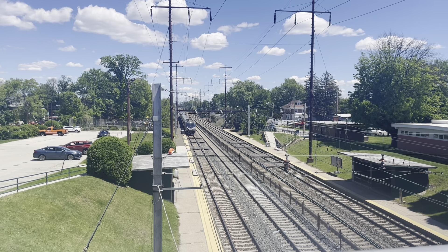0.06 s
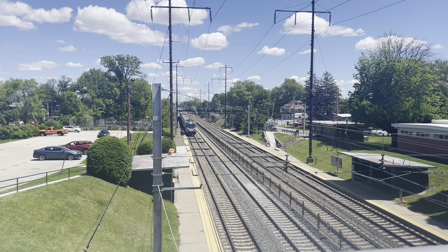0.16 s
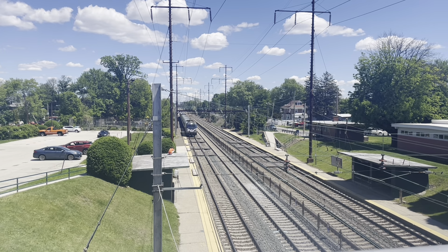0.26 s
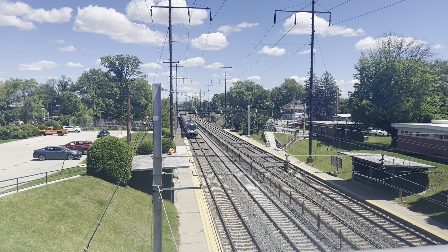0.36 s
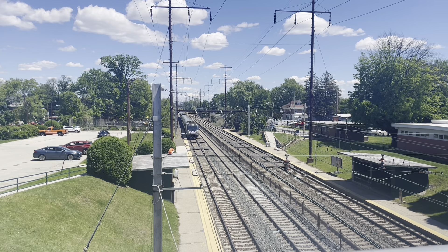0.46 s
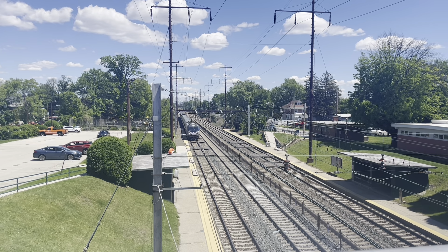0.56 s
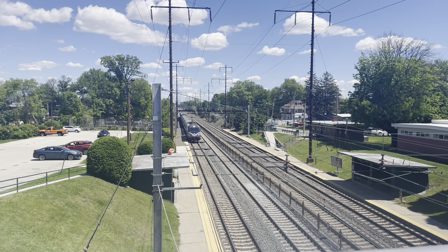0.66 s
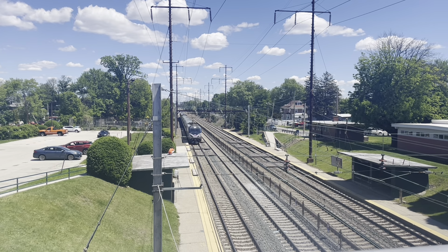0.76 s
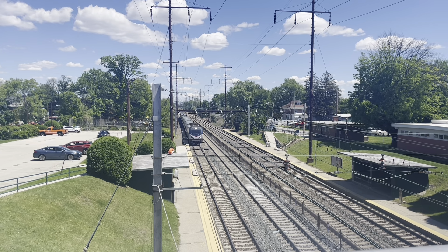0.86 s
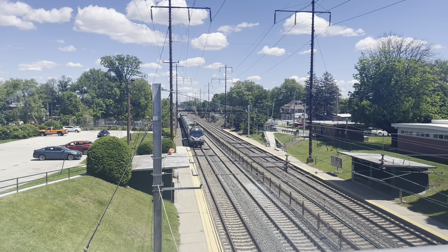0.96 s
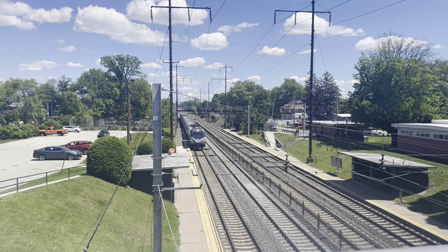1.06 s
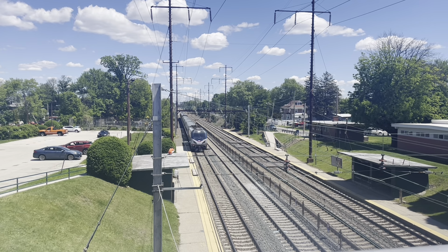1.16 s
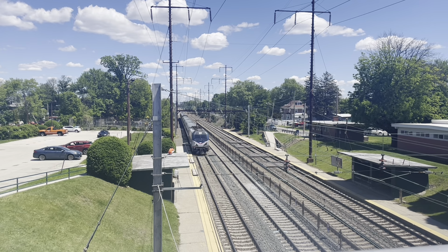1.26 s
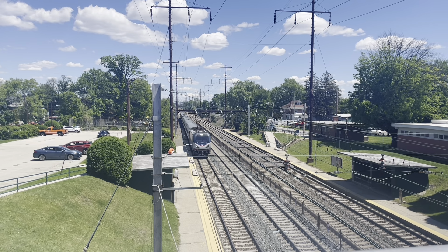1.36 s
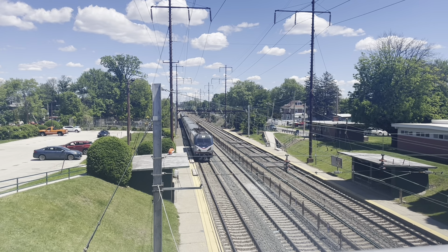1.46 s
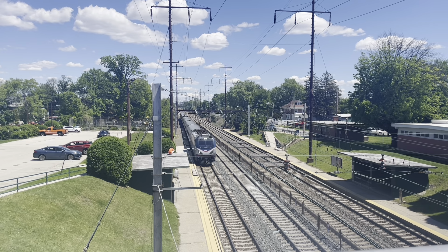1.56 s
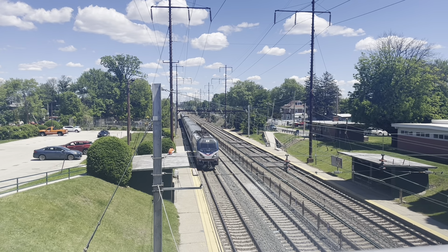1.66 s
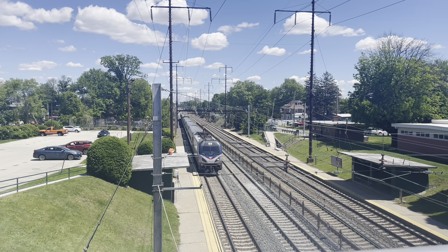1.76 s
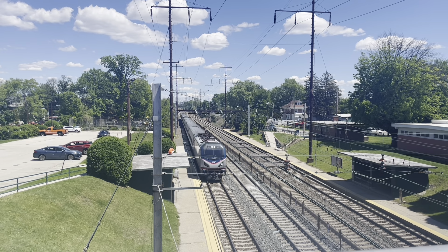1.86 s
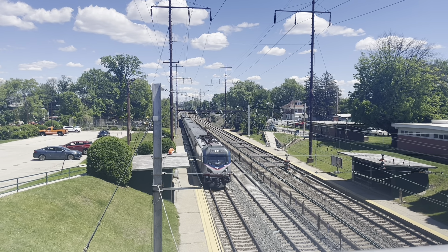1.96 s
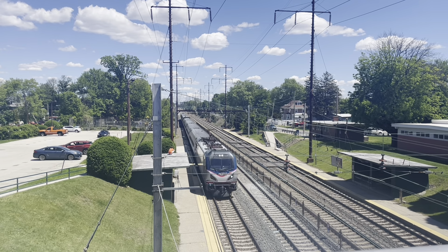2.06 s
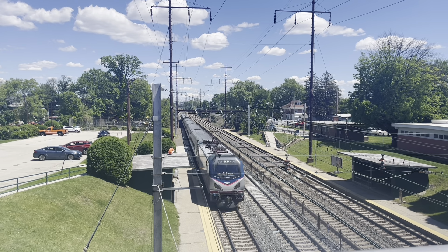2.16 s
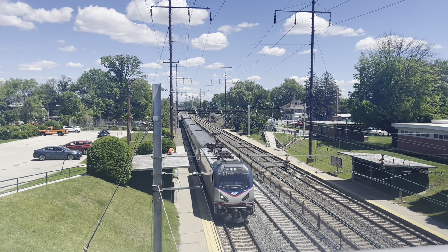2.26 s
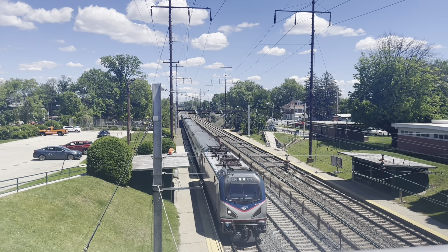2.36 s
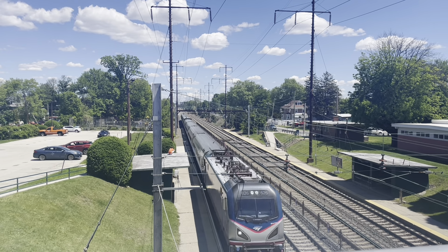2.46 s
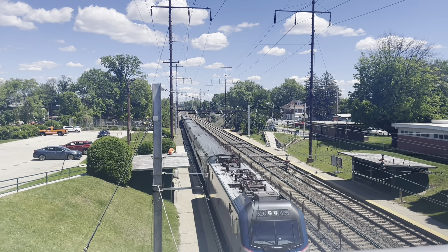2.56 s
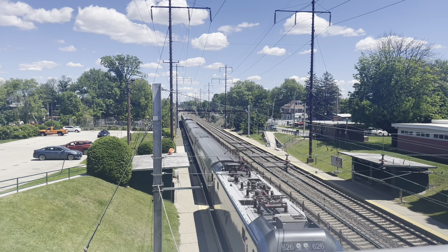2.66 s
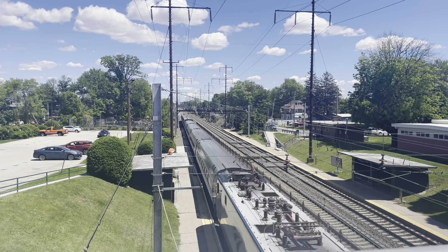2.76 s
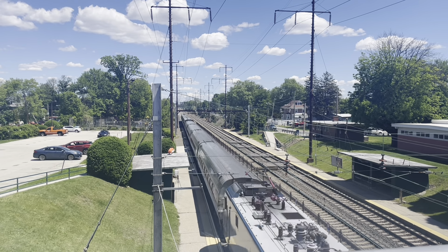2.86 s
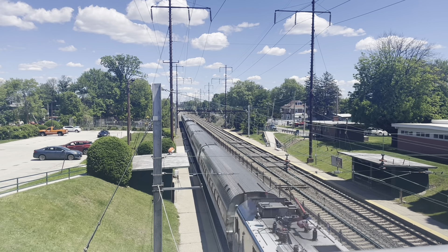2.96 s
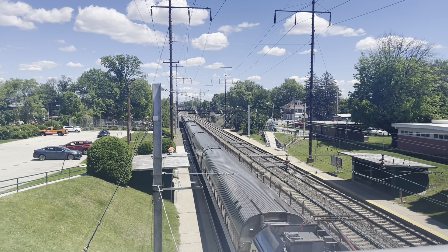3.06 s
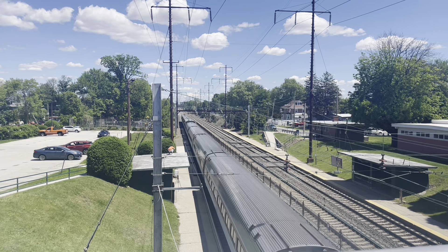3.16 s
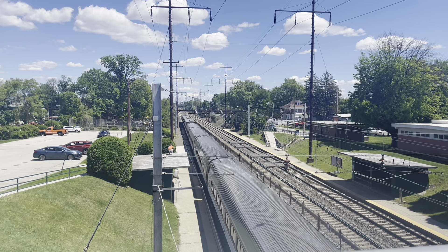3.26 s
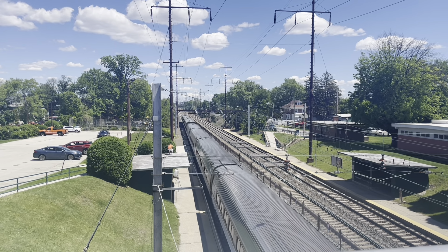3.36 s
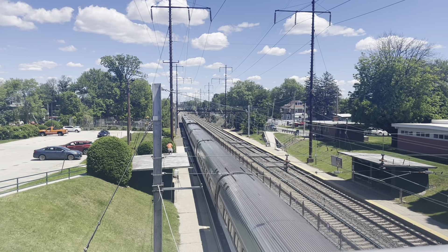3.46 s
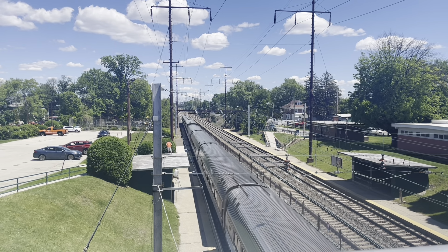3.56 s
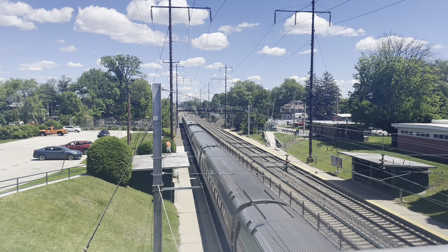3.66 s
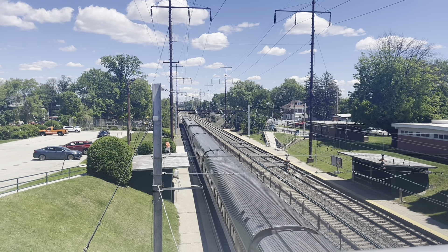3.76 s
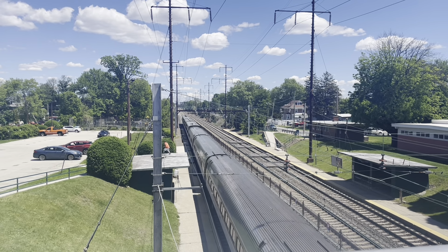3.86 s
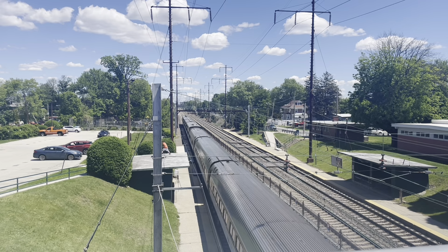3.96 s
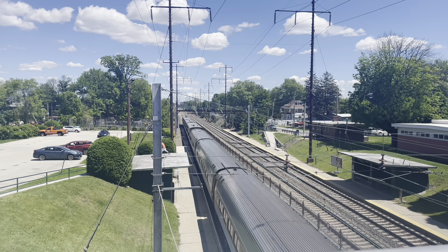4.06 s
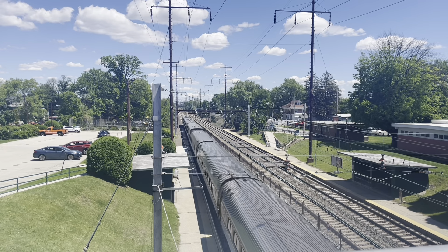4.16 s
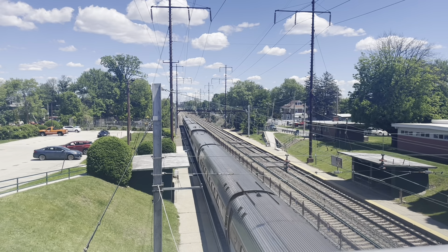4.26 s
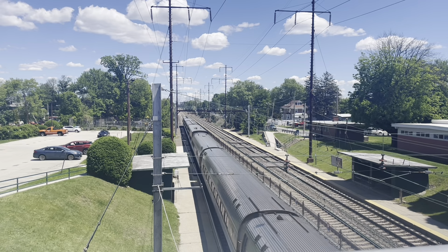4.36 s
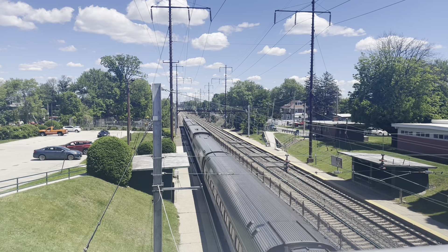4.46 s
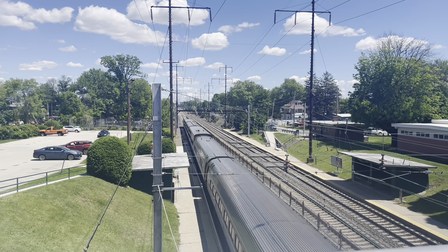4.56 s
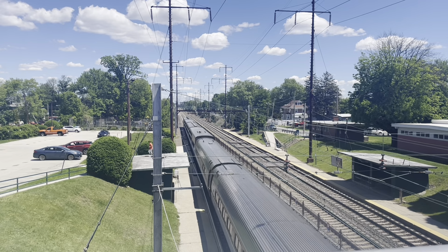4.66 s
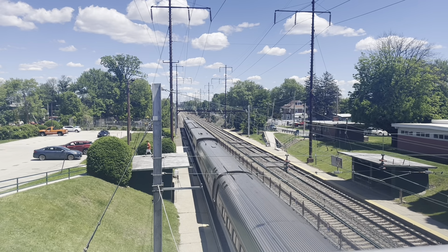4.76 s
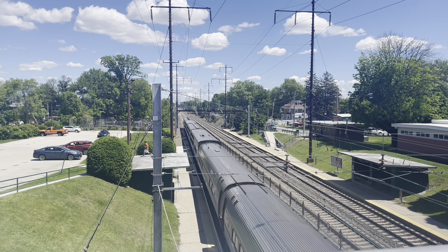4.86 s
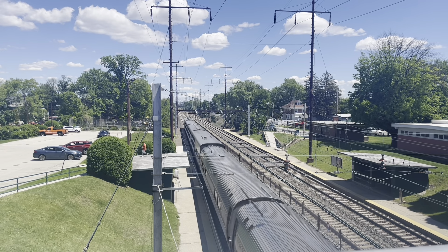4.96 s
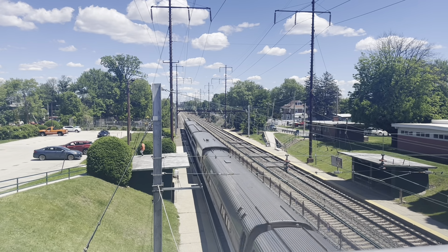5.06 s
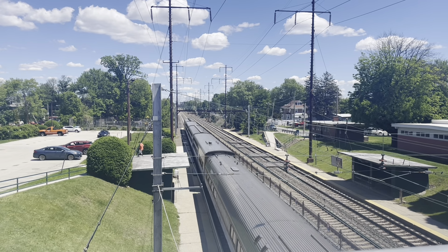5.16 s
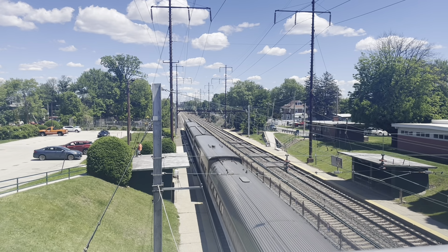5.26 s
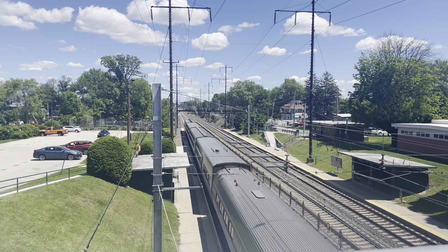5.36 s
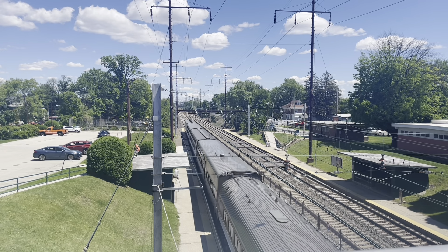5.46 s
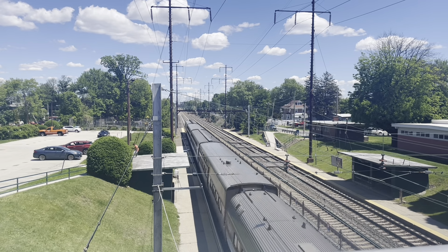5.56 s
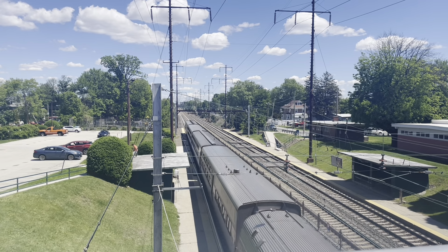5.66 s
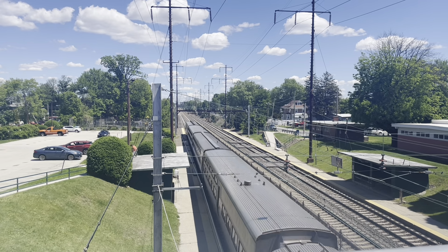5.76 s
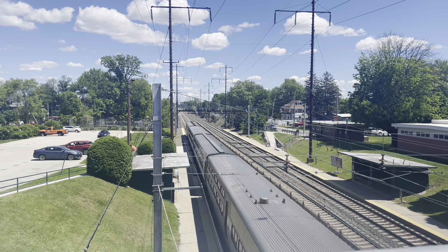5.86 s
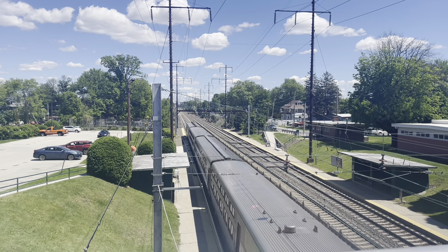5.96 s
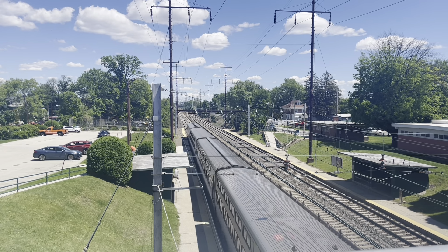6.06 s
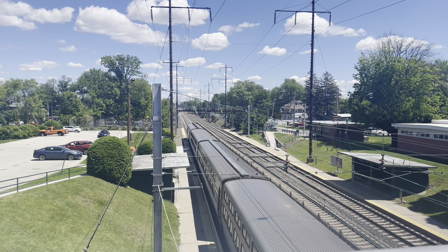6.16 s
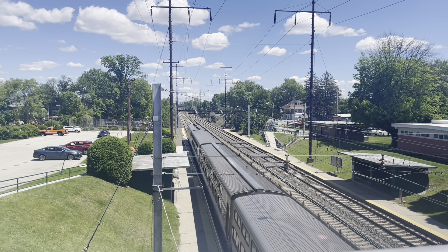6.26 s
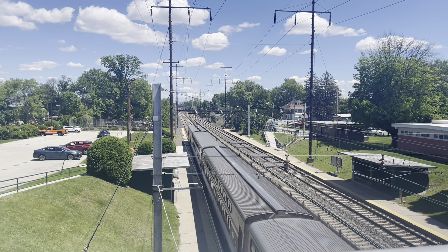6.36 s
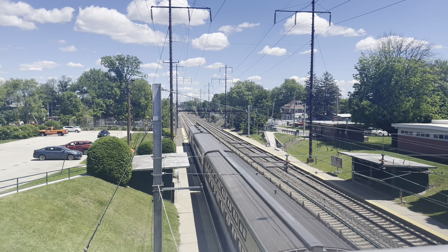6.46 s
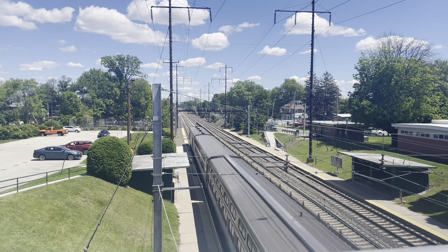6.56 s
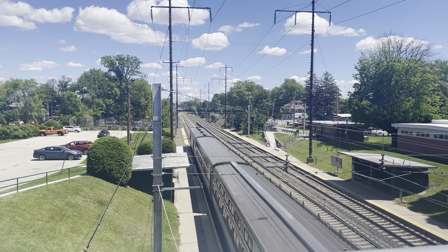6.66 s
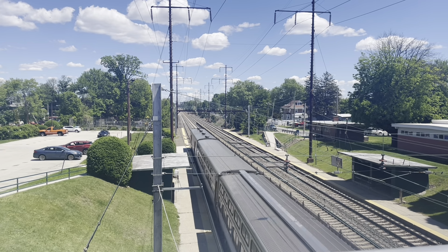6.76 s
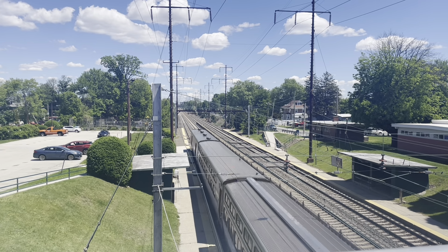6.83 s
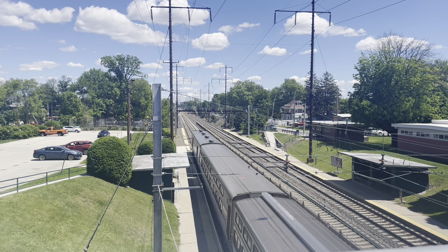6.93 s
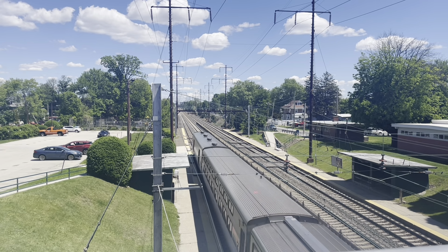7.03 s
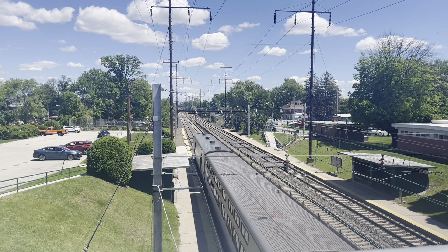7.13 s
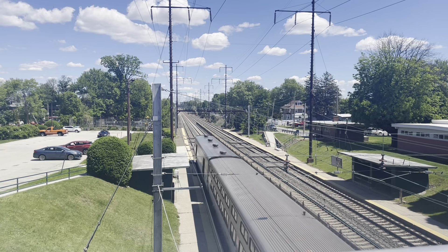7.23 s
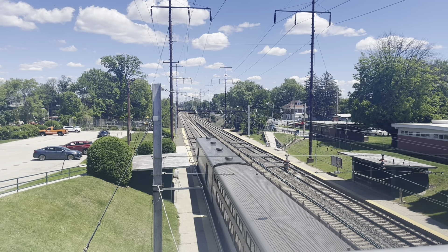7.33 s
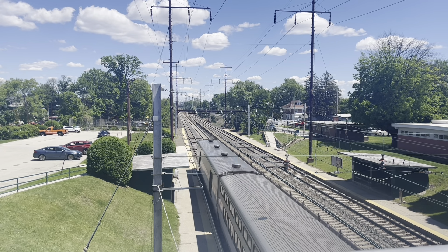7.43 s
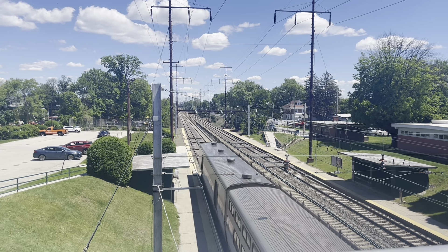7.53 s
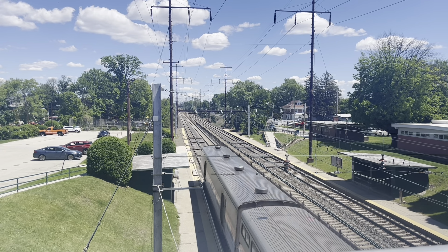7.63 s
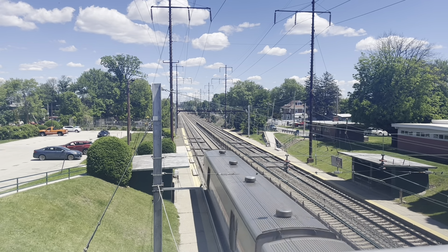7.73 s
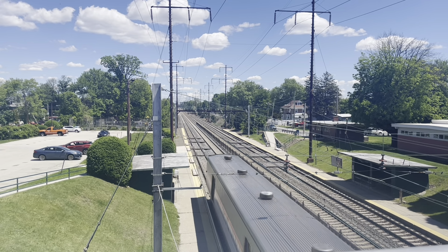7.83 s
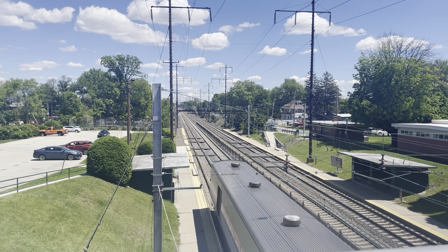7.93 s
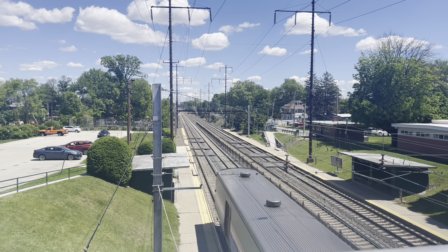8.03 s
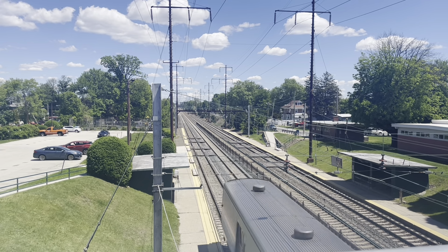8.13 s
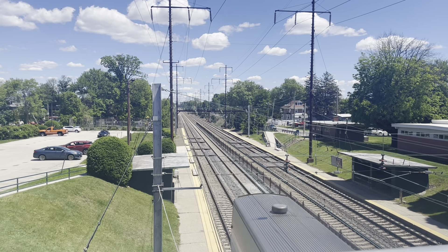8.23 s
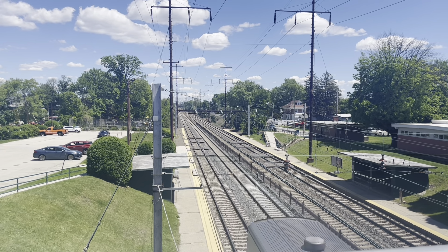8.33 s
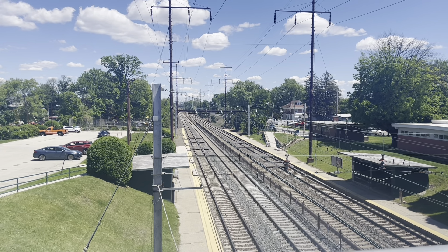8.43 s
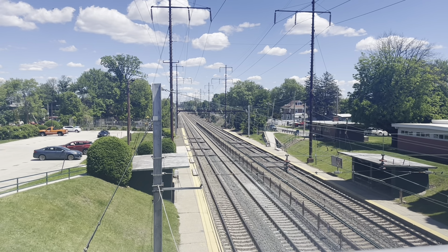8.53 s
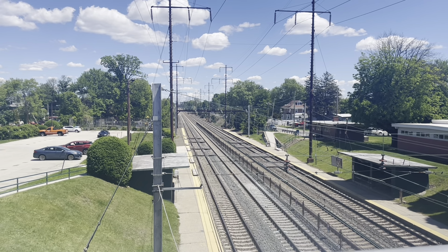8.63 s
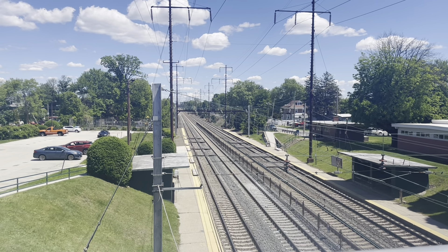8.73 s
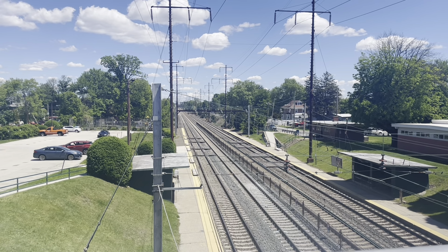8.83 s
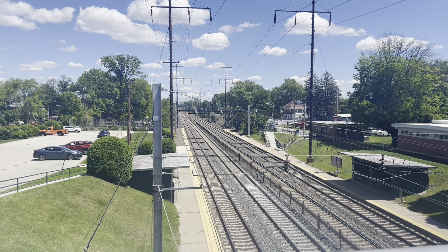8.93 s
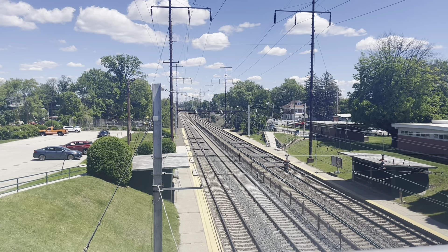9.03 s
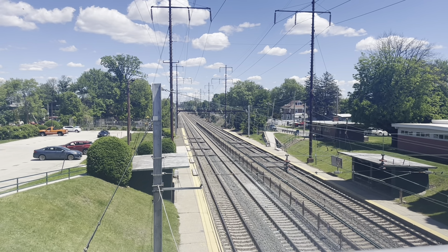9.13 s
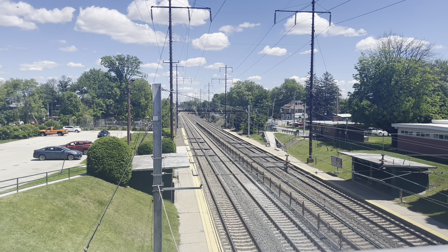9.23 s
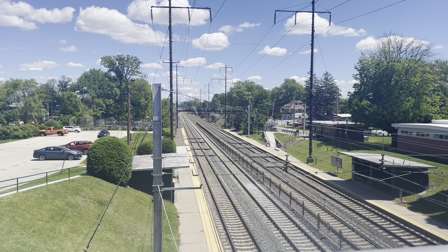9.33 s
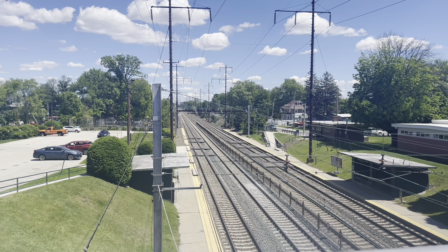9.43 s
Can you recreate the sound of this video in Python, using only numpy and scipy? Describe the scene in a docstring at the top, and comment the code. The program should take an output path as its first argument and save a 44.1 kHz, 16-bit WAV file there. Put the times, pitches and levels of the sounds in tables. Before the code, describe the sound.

Outdoors on a bridge parapet, a phone picks up a thin rising bird whistle, light breeze and faint hiss. Rails sing, then an electric locomotive roars underneath with a horn-like hum and motor whine dropping in pitch. Coaches follow in pulsing swells of steel howl, wheel ring and hiss, with clicks and thuds. The last passes; muffled noise fades with dull knocks on the bridge.

```python
"""An electric express runs under a road bridge, heard from the parapet on a phone, in stereo.
First a small bird's rising whistle (a gliding tone), breeze and microphone hiss; then the rails sing in filtered noise.
The locomotive comes with a noise roar, a horn-like hum and motor whine: tones that drop in pitch as it passes.
Groups of coach bogies bring swells of rail howl, wheel ring and hiss (narrow and wide noise), with light clicks
and thuds (short bursts). Last, dull knocks follow on the bridge as the noise fades behind it."""
import sys
import numpy as np
from scipy import signal
from scipy.fft import rfft, irfft, next_fast_len
from scipy.io import wavfile
from scipy.ndimage import uniform_filter1d

SR = 44100
rng = np.random.default_rng(int(sys.argv[2]) if len(sys.argv) > 2 else 0)


def generate_wav(sig):
    """Save sig (samples, or channels by samples) to the path in sys.argv[1] as 16-bit PCM at SR."""
    pcm = np.round(np.clip(np.atleast_2d(sig).T, -1, 1) * 32767).astype(np.int16)
    wavfile.write(sys.argv[1], SR, pcm)


N = 418744
T = np.arange(N) / SR
SIZE = next_fast_len(N, real=True)
FREQS = np.fft.rfftfreq(SIZE, 1 / SR)
SIDES = np.array([[.5], [-.5]])  # splits a difference between the left and right microphone ports
# when the locomotive reaches the bridge and the last coach leaves it (s)
ARRIVES_S, LEAVES_S = 2.866, 8.57

# how far the left port runs ahead of the right in the wave: [f/Hz, lead/rad]
PORT_LEAD = [(40, -.2), (85, -.24), (150, -.33), (250, -.43), (350, -.37), (500, -.55), (600, -.7),
             (860, .4), (1980, -.4), (3100, .2), (4300, 0), (5200, .6), (6800, -1.1), (7700, -2.8),
             (8700, -3.4), (10900, -6.3), (13600, -7.8)]
# groups of bogies going under the bridge, as loud as their wheels are rough, before the trims of each part:
# [t/s, sleeper level/dB, rail ring level/dB, wheel ring level/dB, hiss level/dB, howl f/Hz, basic half-width/s]
BOGIE_GROUPS = [(2.66, -23.5, -30, -32, -35, 480, 0.12), (2.79, -26, -38, -42, -32, 480.4, .06),
                (3.02, -24.5, -23, -28.5, -33, 450, 0.29), (3.4, -25, -34, -27, -33, 515, 0.11),
                (3.9, -23, -27, -26.5, -33, 530, 0.18), (4.62, -28.5, -32, -27.5, -32.5, 515, 0.19),
                (5.32, -24, -27, -29.5, -34.5, 540, 0.22), (5.92, -23, -24.5, -28.5, -34.5, 535, .16),
                (6.55, -24.5, -24.5, -30, -34.5, 520, 0.18), (7.06, -29, -27.5, -32, -38, 490, 0.17),
                (7.26, -27, -27.5, -30.5, -31.5, 520, 0.11), (7.39, -21.5, -22, -26.5, -32.5, 535, 0.085),
                (7.87, -23.5, -22.5, -27.5, -33, 500, 0.2), (8.4, -23.5, -24, -29, -36, 550, 0.13)]


def undb(db):
    """Decibels to gain."""
    return 10 ** (np.asarray(db) / 20)


def curve(rows, axis=1):
    """One column of a time table, joined by straight lines at every sample."""
    rows = np.array(rows)
    return np.interp(T, rows[:, 0], rows[:, axis])


def across(points):
    """A table of values against frequency, read at every frequency."""
    hz, value = np.transpose(points)
    return np.interp(np.log(FREQS + 1), np.log(hz), value)


def white():
    """The spectrum of a fresh white noise."""
    return rfft(rng.standard_normal(SIZE))


def sound(spectrum):
    """From a spectrum back to samples."""
    return irfft(spectrum, SIZE)[..., :N]


def walk(rate):
    """Smooth random wander of spread 1 that changes about rate times a second."""
    y = sound(white() * np.exp(-.5 * (FREQS / rate) ** 2))
    return y / y.std()


def band(hz, width):
    """Gain of a steep resonance at every frequency."""
    return 1 / (1 + ((FREQS - hz) / width) ** 2) ** 2


def spread(gain):
    """Noise of a wide source with this gain curve, partly alike at the two ports; their mean has rms 1."""
    # how alike the ports sound: [f/Hz, coherence 0-1]
    likeness = [(60, .995), (130, .99), (320, .98), (520, .94), (700, .78), (1320, .75), (2100, .85),
                (4000, .84), (6200, .65), (10000, .55), (13400, .35)]
    # how much louder the left port is than the right: [f/Hz, difference/dB]
    balance = [(200, 0.3), (450, 1), (700, -2.5), (1100, -1.5), (1600, -3.5), (2200, 1.5), (3800, 4),
               (7400, 0.5), (11000, -0.5)]
    common, left, right = white(), white(), white()
    alike, lead = across(likeness), across(PORT_LEAD)
    shared = np.sqrt(alike) * common * np.exp(1j * SIDES * lead)
    separate = np.sqrt(1 - alike) * np.array([left, right])
    summed = np.maximum(1 + alike * np.cos(lead), .5)  # power of the two ports together
    y = sound((shared + separate) * gain * undb(SIDES * across(balance)) / np.sqrt(summed))
    return y / y.mean(axis=0).std()


def roar(spectrum, flutter_db, rate):
    """Noise with this spectrum, its level shaken by a smooth random wander."""
    return spread(undb(across(spectrum))) * undb(flutter_db * walk(rate))


def even(x, span=0.24):
    """A noise with a steadier level but its grain intact; span in seconds."""
    return x / np.sqrt(uniform_filter1d(x.mean(axis=0) ** 2, int(span * SR)) + 0.2)


def tone(hz, blur):
    """A sine of rms 1, its pitch blurred by air and ground reflections; blur is the spread in Hz."""
    return np.sqrt(2) * np.sin(2 * np.pi * np.cumsum(hz + blur * walk(26.6)) / SR)


def blow(start, rise, decay):
    """Envelope of one blow: a quick rise, then an exponential decay; top 1, times in seconds."""
    age = np.maximum(T - start, 0)
    shape = (1 - np.exp(-(age / rise) ** 2)) * np.exp(-np.minimum(age / decay, 20))
    return shape / shape.max()


def microphone_hiss():
    """A faint, steady hiss of the phone's microphone, as filtered noise."""
    # colour of the hiss: [f/Hz, relative level/dB]
    hiss_colour = [(200, -4), (2300, 11), (3100, 2), (4400, 9), (6500, -48), (9500, -3.5), (10100, 12.5),
                   (10900, 6), (11250, 16), (11550, 13.5), (12300, 4), (14000, 4.5)]
    return roar(hiss_colour, flutter_db=1.5, rate=4.6) * undb(-55)


def chirp():
    """A thin rising whistle, as of a small bird: one tone gliding in pitch, before the train covers it."""
    # the bird's notes, before a small waver: [t/s, f/Hz, level/dB]
    notes = [(0, 4950, -90), (.015, 5020, -64), (.044, 5380, -65), (.047, 5400, -95), (.05, 6250, -64),
             (.09, 6300, -65), (.125, 6500, -64), (.21, 6620, -63), (.29, 7350, -68), (.34, 7340, -70),
             (.37, 7360, -120)]
    return tone(curve(notes, axis=1), blur=39) * undb(curve(notes, axis=2) + 2 * walk(18))


def eddies(spectrum):
    """Air turbulence that reaches the right port before the left."""
    wind_lead = -1.5  # radians that left leads
    y = sound(white() * undb(across(spectrum)) * np.exp(1j * wind_lead * SIDES))
    return y / y.mean(axis=0).std()


def rumble():
    """Axle loads shake the ground and car bodies boom; before they arrive a breeze buffets the ports."""
    # colour of the ground's shaking: [f/Hz, relative level/dB]
    ground_colour = [(18, -22), (30, -14), (42, 6), (52, 9), (66, 12), (80, 5), (100, 6), (150, -83)]
    # colour of the car bodies' boom: [f/Hz, relative level/dB]
    body_colour = [(55, -13), (85, -1.5), (130, 1.5), (180, -2.5), (225, -5), (270, -10.5), (310, -16.5),
                   (420, -29), (700, -80)]
    # low end of the passage, before its flutter: [t/s, ground level/dB, car-body level/dB]
    lows = [(0, -52, -42), (.45, -33.5, -40), (.85, -36, -37.5), (1.4, -30, -32.5), (1.68, -33, -27.5),
            (2.1, -27.5, -29), (2.75, -21.5, -20), (3.3, -26.5, -19.5), (3.65, -27, -23), (4.2, -27, -21),
            (4.45, -25.5, -29.5), (5.4, -27.5, -25.5), (6.4, -27, -29.5), (7.05, -28.5, -27),
            (7.4, -27.5, -24), (8.4, -29, -25), (8.75, -28.5, -32), (9.05, -24.5, -30), (9.5, -31, -34.5)]
    # part of the bass power that is breeze: [t/s, share 0-1]
    wind_share = [(0, .75), (1.1, .6), (1.5, .25), (2.1, .02), (2.4, 0)]
    wind = curve(wind_share)

    def with_breeze(colour):
        """Train and breeze mixed by power in the same colour."""
        train = np.sqrt(1 - wind) * spread(undb(across(colour)))
        return even(train + np.sqrt(wind) * eddies(colour))

    ground = with_breeze(ground_colour) * undb(curve(lows, axis=1) + 0.41 * walk(12))
    bodies = with_breeze(body_colour) * undb(curve(lows, axis=2) + 1.2 * walk(28))
    return ground + bodies


def rail_song():
    """The rails carry the wheels' noise ahead of the train and ring in their resonances until it arrives."""
    # resonances of the singing rails: [f/Hz, relative level/dB]
    song_colour = [(560, -25), (700, 8), (840, -14), (1120, -7), (1310, 2), (1480, -8), (1720, -22),
                   (2020, -4), (2250, -9), (2700, -12), (3150, -7), (3550, -18), (4300, -35), (6000, -50)]
    early = ARRIVES_S - T
    growth = undb(-35.5 - 3.5 * np.maximum(early, 0))  # grows by 3.5 dB a second
    swell = growth * (.5 + .5 * np.tanh(early / .3))  # and gives way at the arrival
    return roar(song_colour, flutter_db=2.3, rate=8) * swell


def knocks():
    """Heavily damped blows on coaches and bridge, each a few cycles of one pitch with some noisy rattle."""
    # dull thuds from the coaches and knocks on the bridge:
    # [t/s, f/Hz, rise/s, decay/s, level of the pitched part/dB, rattle against it 0-1]
    thuds = [(.262, 102, 0.0069, 0.017, -18.5, 0.1), (2.758, 121, 0.012, 0.02, -14, 0.17),
             (3.362, 83, 0.0066, .014, -13, 0), (3.868, 74, .008, .014, -15, 0.54),
             (3.937, 149, 0.0073, 0.013, -18, 0.46), (4.046, 164, 0.0056, 0.014, -18, 0.1),
             (4.114, 129, .007, 0.015, -19, 0.4), (4.19, 135, .007, .014, -18, 0.14),
             (4.243, 150, 0.0054, 0.0093, -22, 0), (4.275, 138, 0.0059, 0.0096, -22, 0),
             (4.295, 74, 0.011, .018, -15, 0), (4.669, 109, 0.0092, .016, -18, 0.2),
             (8.898, 760, 0.0044, 0.014, -24, 1), (8.931, 496, 0.0012, 0.0069, -10, 0.2),
             (8.939, 604, 0.0017, 0.0055, -14.5, 0.4), (8.941, 250, 0.0043, .009, -20, .1),
             (9.005, 95, .015, 0.034, -21, .05), (9.142, 800, 0.002, 0.011, -21.5, 1),
             (9.173, 472, 0.002, 0.0053, -9, 0.3), (9.176, 247, 0.0034, 0.0087, -21, 0.2),
             (9.204, 84, 0.0052, 0.0067, -17, 0.35)]
    loose = spread(band(480, 510))
    total = 0
    for s, hz, rise, decay, db, rattle in thuds:
        body = np.sin(2 * np.pi * hz * (T - s)) + rattle * loose
        total = total + undb(db) * blow(s, rise, decay) * body
    return total


def scrapes():
    """A flange rubs the rail and one wheel resonance, a narrow noise, swells and fades."""
    # flanges brushing the rail: [t/s, f/Hz, width/Hz, length/s, level/dB]
    rubs = [(2.103, 3170, 690, 0.0087, -34), (3.313, 1750, 200, 0.052, -24.5), (3.3, 3000, 200, .022, -31),
            (3.41, 3980, 300, 0.05, -40), (5.82, 4940, 500, 0.16, -41), (5.9, 4050, 350, 0.26, -42),
            (6.2, 4300, 450, .13, -48), (6.58, 4970, 450, 0.25, -43.5), (6.52, 4000, 350, 0.17, -51),
            (7.747, 820, 90, 0.044, -23.5), (8.7, 2480, 300, .018, -36), (8.767, 2494, 140, 0.018, -32)]
    total = 0
    for s, hz, width, length, db in rubs:
        swell = np.exp(-((T - s) / length) ** 2)
        total = total + spread(band(hz, width)) * undb(db) * swell
    return total


def clicks():
    """Each wheel blow briefly rings rail and wheel: a short burst of metallic noise."""
    # wheels clicking on the rail: [t/s, level at the top of the burst/dB]
    wheel_blows = [(2.098, -24), (2.581, -28), (2.757, -27), (3.272, -22), (3.406, -23), (4.5, -27),
                   (5.32, -35), (5.759, -28), (5.972, -31), (7.152, -33), (7.205, -30), (7.328, -23),
                   (7.367, -22), (7.402, -22), (7.846, -27), (8.43, -30), (8.5, -27), (8.759, -31)]
    steel = spread(band(500, 350) + 2.9 * band(2570, 1500) + 0.11 * band(2500, 1700))
    return steel * sum(undb(db) * blow(s, rise=0.00085, decay=0.0074) for s, db in wheel_blows)


def wheel_song():
    """Struck wheels sing in their modes: tones swell and die away, each with a small random waver in pitch."""
    # wheel modes: [t/s, f/Hz, rise/s, decay/s, peak level/dB]
    modes = [(2.579, 1712, .006, .03, -25), (2.577, 3171, .008, .032, -27), (2.585, 4565, .04, .09, -36),
             (2.572, 1912, .006, .04, -27), (2.612, 1912, .045, .07, -23), (2.772, 1885, .012, .05, -28),
             (3.385, 4090, .015, .035, -35)]
    total = 0
    for s, hz, rise, decay, db in modes:
        mode = tone(hz, blur=9) / np.sqrt(2)  # peak 1
        total = total + undb(db) * blow(s, rise, decay) * mode
    return total


def locomotive():
    """Hum and whine sink together by the Doppler shift as the locomotive passes; each tone wavers in pitch."""
    # pitch change of a passing source: [t/s, pitch ratio]
    doppler_ratio = [(0, 1), (1.8, 1), (2.3, .996), (2.55, .985), (2.66, .98), (2.8, .961), (3.05, .958),
                     (3.4, .95)]
    # blower tones, two strong ones that beat and a weak third: [f while approaching/Hz, relative level/dB]
    blower_tones = [(338, 0), (329, -6), (319, -10)]
    # loudness of the hum, before its waver: [t/s, level/dB]
    hum_level = [(0, -59), (.15, -47), (.7, -41), (2.1, -30.5), (2.56, -24.5), (2.72, -33), (2.8, -18.5),
                 (3.0, -24), (3.08, -39), (3.3, -30.5), (3.6, -83)]
    # motor and gear tones: [f while approaching/Hz, relative level/dB]
    motor_tones = [(1100, -5), (1295, -3), (1335, -7), (1405, -6), (1465, -6), (1946, -2.5), (1905, -6),
                   (2300, -10), (3220, -18)]
    # loudness of the whine, before its waver: [t/s, level/dB]
    whine_level = [(0, -55), (1.25, -52), (1.45, -40.5), (1.75, -41.5), (1.88, -47), (2.25, -36.5),
                   (2.5, -36), (2.66, -32), (2.9, -39), (3.5, -75)]
    doppler = curve(doppler_ratio)
    hum = sum(undb(db) * tone(hz * doppler, blur=3.6) for hz, db in blower_tones)
    hum = hum * undb(1.8 * walk(3.6))  # all hum tones waver together
    # each whine wavers in level by itself
    whine = sum(undb(db + 3 * walk(23)) * tone(hz * doppler, blur=13) for hz, db in motor_tones)
    left_heavy = undb(1.4 * SIDES)  # whine 1.4 dB louder on the left
    return hum * undb(curve(hum_level)) + whine * undb(curve(whine_level)) * left_heavy


def passage(axis, front_db, approach_db_per_s, body_db, stretch, reach, fade_db_per_s=0, lag_s=0):
    """Loudness of one part of the rolling noise: it grows, holds, swells with each bogie group and fades.
    stretch widens the swells, reach lengthens their skirts, lag_s delays them."""
    arrived = .5 + .5 * np.tanh((T - ARRIVES_S) / 0.4)
    front = undb(front_db + approach_db_per_s * np.minimum(T - ARRIVES_S, 0))
    coaches = undb(body_db - fade_db_per_s * np.maximum(T - LEAVES_S, 0))
    power = front ** 2 * (1 - arrived) + coaches ** 2 * arrived
    for row in BOGIE_GROUPS:
        away = (T - row[0] - lag_s) / (row[-1] * stretch)
        power = power + undb(row[axis]) ** 2 * (1 + reach * away ** 2) ** (-1 / reach)
    return np.sqrt(power)


def approaching(x, far_s=2.5):
    """The air takes the treble off a sound while the locomotive is far away."""
    loss_db_per_s = 4  # the dull copy's loss at 5 kHz, for each second of far_s
    dull = sound(rfft(x, SIZE) * undb(-loss_db_per_s * far_s * (FREQS / 5000) ** 2))
    far = np.clip((ARRIVES_S - T) / far_s, 0, 1) ** 2
    return far * dull + (1 - far) * x


def screened():
    """Gain of wheel ring and hiss as the deck hides the last wheels: 3 dB are lost within 0.39 s."""
    return undb(-3 * np.clip((T - LEAVES_S) / 0.39, 0, 1))


def howl():
    """A narrow resonance of rippled rail whose pitch shifts from one group of bogies to the next."""
    width_hz = 38  # how fast the random level wanders, which sets the half-width
    hz = curve(BOGIE_GROUPS, axis=5)
    lead = np.interp(hz, *np.transpose(PORT_LEAD))
    phase = 2 * np.pi * np.cumsum(hz) / SR + lead * SIDES
    return walk(width_hz) * np.cos(phase) + walk(width_hz) * np.sin(phase)


def sleeper_noise(behind):
    """The rails bounce on the sleepers and howl, until the train is behind the bridge."""
    # resonance of the rails on the sleepers: [f/Hz, relative level/dB]
    sleeper_colour = [(230, -34), (310, -11), (390, -2), (450, 1.5), (510, 1.5), (600, 1), (660, -5),
                      (730, -21), (900, -68)]
    bounce = passage(axis=1, front_db=-30.0, approach_db_per_s=6.0, body_db=-32.5, stretch=1.01, reach=0.4)
    sleepers = roar(sleeper_colour, flutter_db=1.0, rate=40) + undb(-4.5) * howl()
    return even(sleepers) * np.sqrt(1 - behind) * bounce


def rail_noise(front, behind):
    """Roughness rings the rails: under the locomotive, under the coaches, then from behind the bridge."""
    # ring under the locomotive: [f/Hz, relative level/dB]
    loco_colour = [(170, -53), (260, -0.5), (400, 4.5), (560, -16.5), (700, -8.5), (780, -3.5), (850, -3),
                   (930, -2.5), (1080, 1), (1290, -1), (1450, -4), (1600, -6.5), (1800, -12), (2300, -82)]
    # ring under the coaches: [f/Hz, relative level/dB]
    coach_colour = [(560, -6), (700, -8), (790, 3), (850, 4), (950, 0), (1130, 3), (1260, -0.5), (1450, 3),
                    (1650, -2.5), (1850, -12), (2300, -62)]
    # track noise from behind the bridge: [f/Hz, relative level/dB]
    behind_colour = [(150, 0), (220, -3), (420, 3.5), (520, -6.5), (700, -1), (900, -6.5), (1060, -1),
                     (1400, -11.5), (1720, -15.5), (1890, -8), (2060, -13.5), (2230, -24), (2500, -15.5),
                     (3100, -45.5)]
    rail_ring = passage(axis=2, front_db=-25.0, approach_db_per_s=6, body_db=-34.0, fade_db_per_s=1.0,
                        stretch=1.27, reach=0.47)
    loco = roar(loco_colour, flutter_db=1.35, rate=5.6) * np.sqrt(front) * undb(2.0)
    coaches = roar(coach_colour, flutter_db=.7, rate=12) * np.sqrt((1 - front) * (1 - behind)) * undb(-1.8)
    # the deck screens the treble of what is behind it
    leaving = roar(behind_colour, flutter_db=1.5, rate=8.5) * np.sqrt(behind) * undb(5)
    return (loco + coaches + leaving) * rail_ring


def wheel_noise():
    """Roughness makes the wheel discs ring, higher up than the rails."""
    # ring of the wheel discs: [f/Hz, relative level/dB]
    wheel_colour = [(1200, -12.5), (1600, -6), (1850, 2), (2050, 4), (2300, -2), (2650, -10), (3100, -11),
                    (4500, -101)]
    wheel_ring = passage(axis=3, front_db=-32.0, approach_db_per_s=5.5, body_db=-35.5, fade_db_per_s=13,
                         stretch=1.14, reach=0.36)
    return roar(wheel_colour, flutter_db=1.0, rate=9.9) * wheel_ring


def contact_hiss(front):
    """The contact of wheel and rail hisses, in one colour for the locomotive and one for the coaches."""
    # hiss of the coaches' wheels: [f/Hz, relative level/dB]
    coach_hiss_colour = [(1900, -9), (2700, 3.5), (3200, 2), (4100, 2), (5000, -2.5), (6000, -5.5),
                         (7500, -13.5), (10800, -53.5), (13500, -30)]
    # hiss of the locomotive's wheels: [f/Hz, relative level/dB]
    loco_hiss_colour = [(1700, -10.5), (2400, 10), (3100, 1.5), (3700, 0), (5000, -4.5), (6000, -5),
                        (7500, -17.5), (10800, -17.5), (13500, -20)]
    contact = passage(axis=4, front_db=-33.5, approach_db_per_s=5.0, body_db=-40.5, fade_db_per_s=10.5,
                      stretch=0.92, reach=0.16)
    coach_hiss = roar(coach_hiss_colour, flutter_db=0.8, rate=15) * np.sqrt(1 - front) * undb(-0.5)
    loco_hiss = approaching(roar(loco_hiss_colour, flutter_db=1.03, rate=18)) * np.sqrt(front) * undb(3.0)
    return (coach_hiss + loco_hiss) * contact


def fine_sizzle():
    """The finest hiss beams straight up from the wheels, so its swells are shorter."""
    # colour of the finest hiss: [f/Hz, relative level/dB]
    sizzle_colour = [(3500, -27), (6000, 4), (7500, -39), (9200, 5.5), (10800, 6.5), (12000, -1),
                     (13500, -4.5)]
    overhead = passage(axis=4, front_db=-44, approach_db_per_s=17, body_db=-39.5, fade_db_per_s=12,
                       stretch=0.76, reach=.15, lag_s=0.023)
    return roar(sizzle_colour, flutter_db=1.2, rate=17) * overhead * undb(-14.5)


def rolling():
    """Roughness between wheel and rail rings sleepers, rails and wheel discs; the contact hisses."""
    # part of the power that comes from the locomotive, before level trims: [t/s, share 0-1]
    loco_share = [(0, 0.95), (2.2, 0.9), (3.1, 0.78), (3.6, 0.06), (4.3, 0.14)]
    # part of the power that arrives from behind the bridge, before level trims: [t/s, share 0-1]
    behind_share = [(4.5, 0.01), (7.2, 0.07), (8.5, 0.14), (8.9, 0.47), (9.1, 1)]
    front, behind = curve(loco_share), curve(behind_share)
    treble = (wheel_noise() + contact_hiss(front)) * screened()
    return sleeper_noise(behind) + rail_noise(front, behind) + treble + fine_sizzle()


def scene():
    """The train over a faint steady microphone hiss."""
    background = microphone_hiss() + chirp() + rumble() + rail_song()
    details = knocks() + scrapes() + clicks() + wheel_song()
    return background + details + locomotive() + rolling()


def record(dry):
    """The phone cuts the top: a steep low-pass at 13600 Hz."""
    return signal.sosfilt(signal.ellip(10, .2, 70, 13600, fs=SR, output="sos"), dry)


dry = scene()
out = record(dry)
generate_wav(out)
```